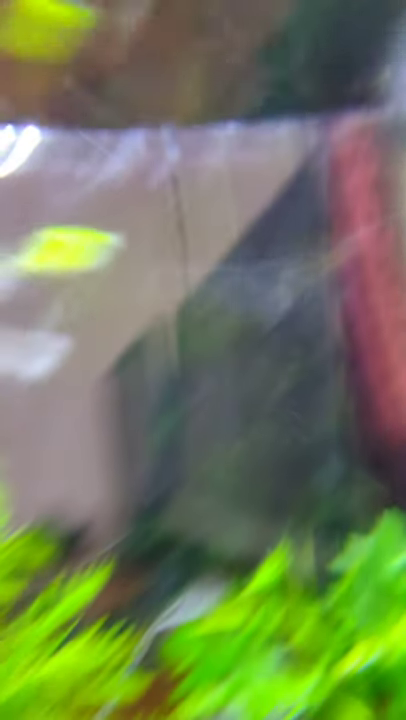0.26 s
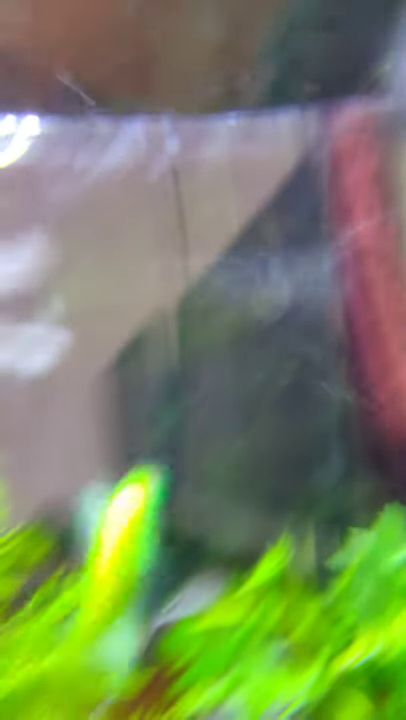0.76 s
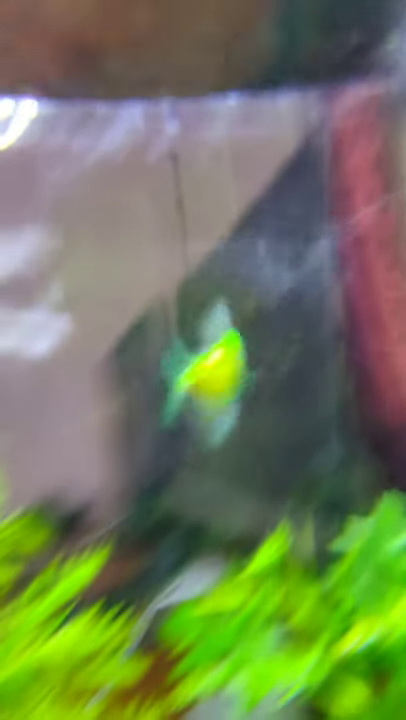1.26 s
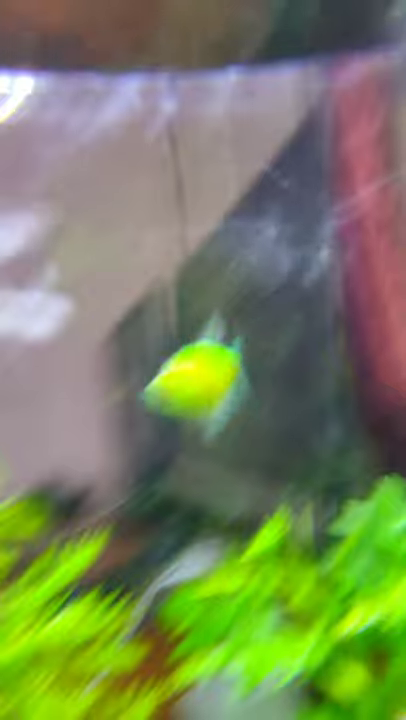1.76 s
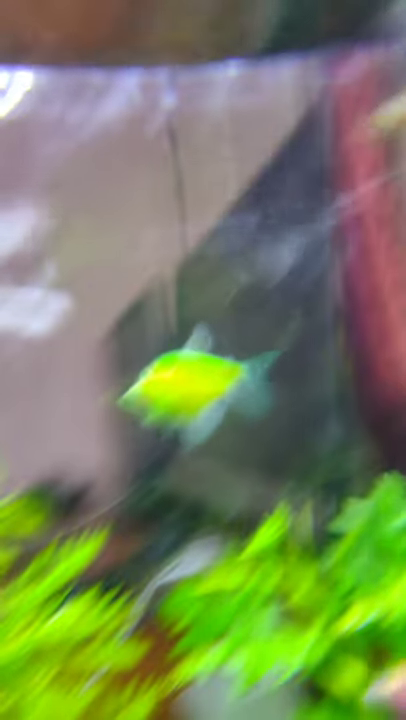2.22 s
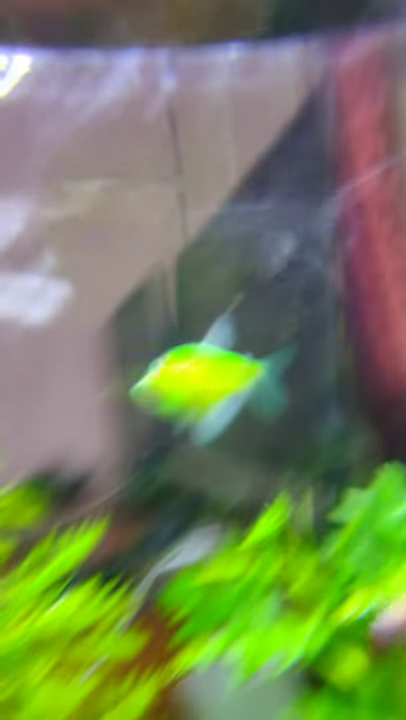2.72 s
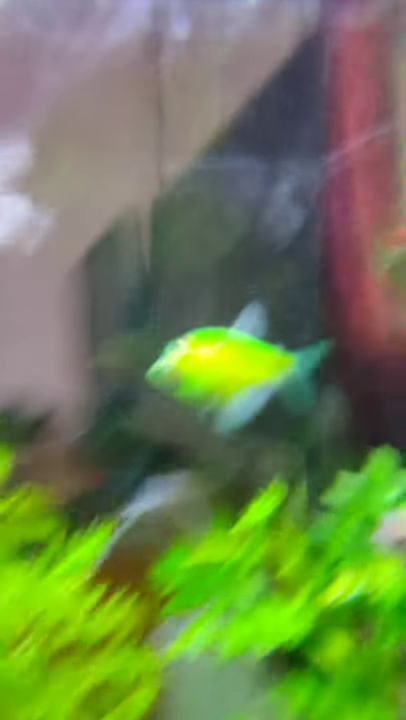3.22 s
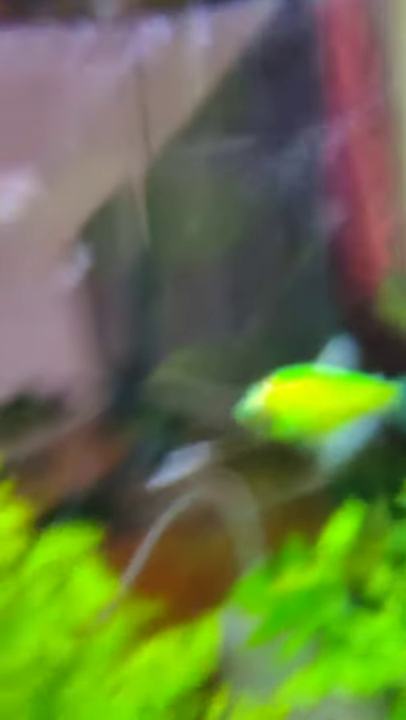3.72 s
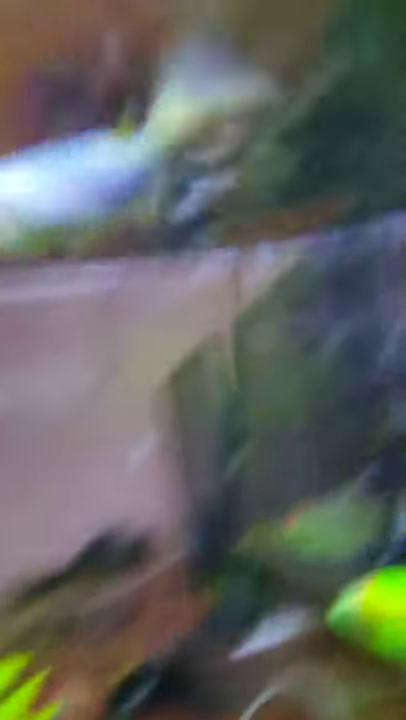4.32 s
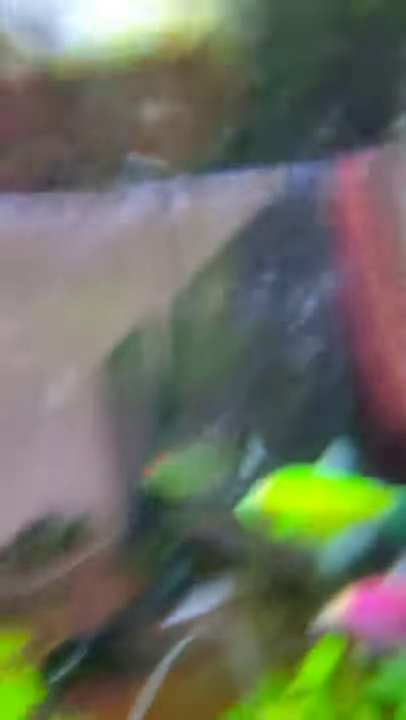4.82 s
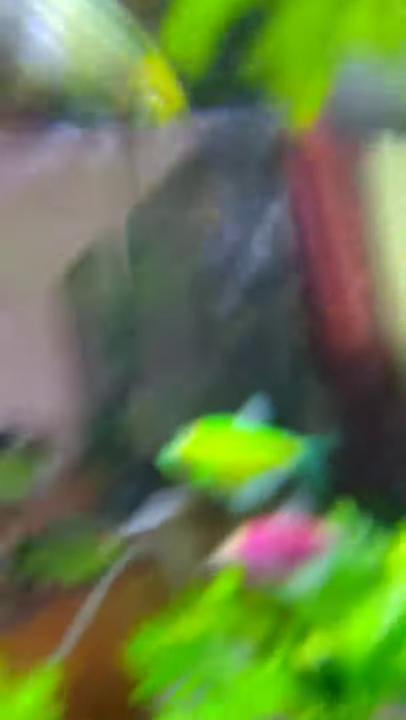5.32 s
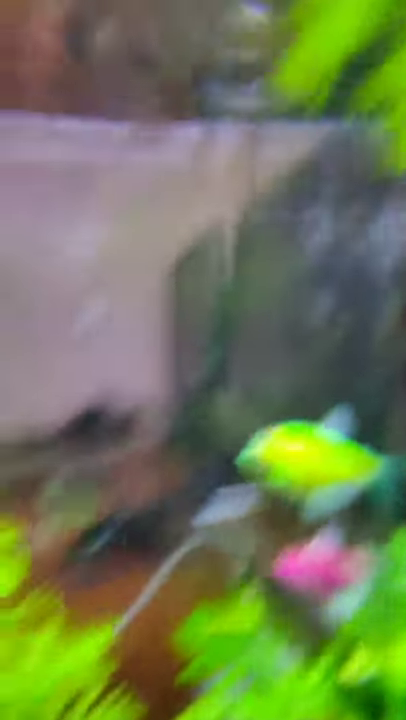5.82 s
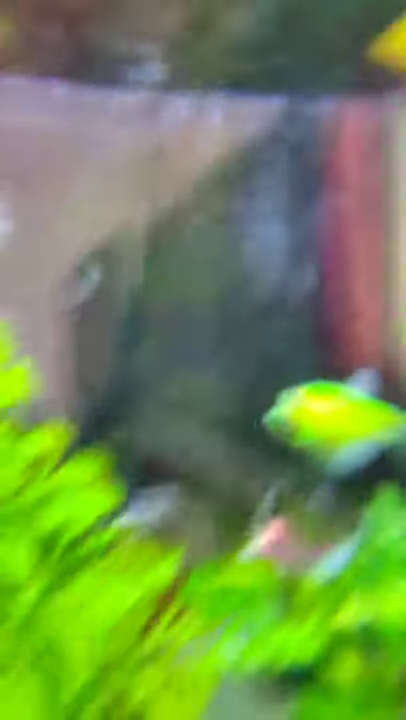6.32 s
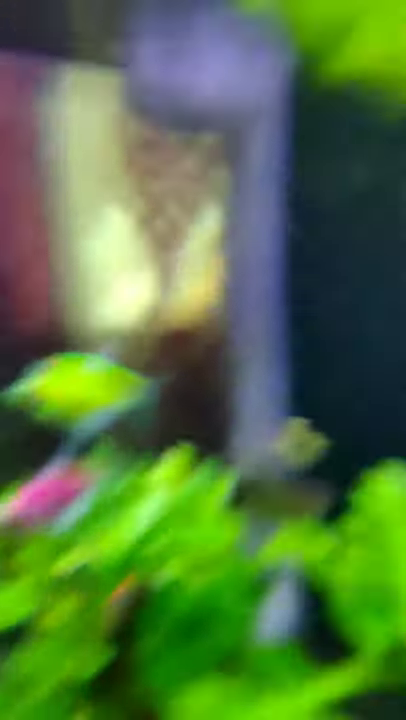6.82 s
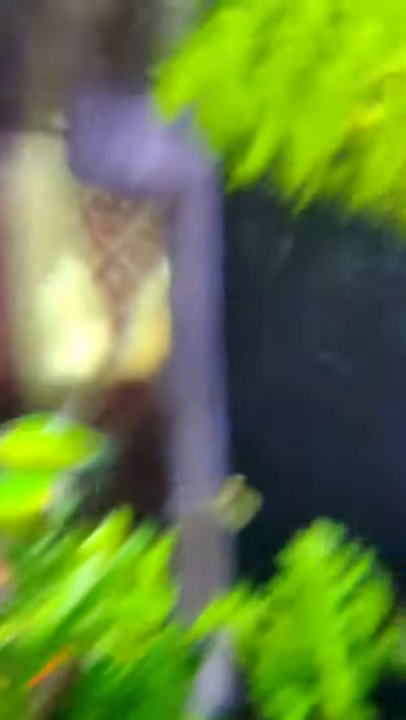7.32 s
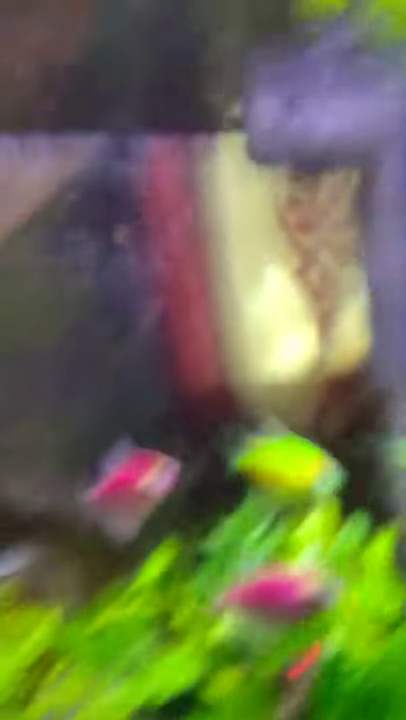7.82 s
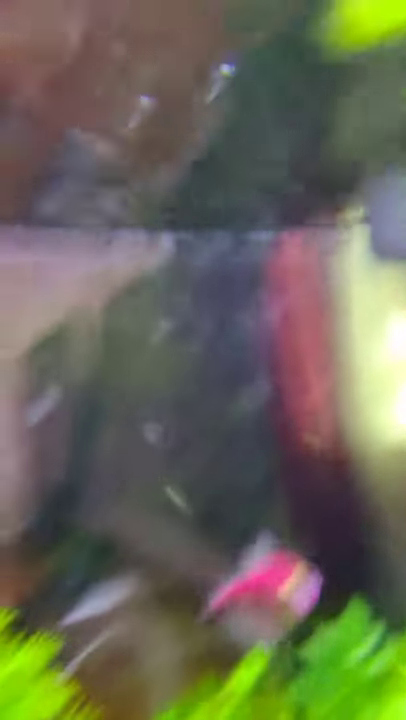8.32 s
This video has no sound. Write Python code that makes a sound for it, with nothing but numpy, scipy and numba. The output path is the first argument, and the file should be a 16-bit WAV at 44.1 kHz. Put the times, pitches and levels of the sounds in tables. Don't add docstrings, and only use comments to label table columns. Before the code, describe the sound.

Bubbles gurgle and pop close by, muffled underwater in a fish tank, over a steady low pump hum and a few dull thumps.

```python
import sys
import numpy as np
from scipy import signal
from scipy.fft import rfft, irfft
from scipy.io import wavfile
from scipy.ndimage import uniform_filter1d, minimum_filter1d
from numba import njit

SR = 44100
rng = np.random.default_rng(int(sys.argv[2]) if len(sys.argv) > 2 else 0)


def persist_wave(psi):
    counts = np.round(np.clip(psi, -1, 1) * 32767).astype(np.int16)
    wavfile.write(sys.argv[1], SR, np.atleast_2d(counts).T)


def convert_level_to_amplitude(level_db):
    exponent = np.asarray(level_db, float) / 20
    return 10 ** exponent


N = 377496
PINCH_RAD = 5.5

# t/s, peak level/dB, f/Hz, ring/cycles
LARGE_BUBBLES = [(0.055, -12, 844, 18), (0.723, -9.5, 857, 4.3), (0.955, -2, 930, 4.6),
                 (0.993, -8.5, 773, 6.9), (1.015, -2, 804, 5.2), (1.041, -3.5, 847, 8.2),
                 (1.236, -1.5, 910, 3.1), (1.301, -8, 805, 8.3), (1.333, -8.5, 751, 11.3),
                 (1.654, -12.5, 818, 7.8), (1.742, -13, 758, 17), (1.918, -12.5, 835, 5.5),
                 (1.96, -8, 750, 7.6), (2.07, -5.5, 844, 8.3), (2.238, -17, 770, 29),
                 (2.303, -4.5, 794, 6.4), (2.35, -10, 808, 14.5), (3.572, -11.5, 869, 15),
                 (5.146, -15, 777, 14), (5.319, -12.5, 922, 10), (5.399, -6, 817, 7), (5.416, -3, 828, 5.5),
                 (5.495, -17, 773, 17), (5.925, -14, 796, 16), (6.015, -10.5, 790, 10.3),
                 (6.057, -5, 843, 11.4), (6.189, -8.5, 768, 33), (6.546, -8.5, 693, 4.5),
                 (6.984, -1.5, 700, 3.3), (7.211, -6, 936, 13)]
# t/s, peak level/dB, f/Hz, ring/cycles
MIDDLE_BUBBLES = [(0.439, -7, 1405, 7.5), (0.513, -2, 1194, 7.1), (0.564, -2, 1180, 8.5),
                  (0.643, -8, 1097, 14), (0.91, -18, 1340, 9.4), (1.481, -4.5, 1095, 8.8),
                  (2.049, 0, 1360, 3.7), (2.473, -10, 1077, 14), (2.948, -12.5, 1116, 18),
                  (3.411, -14, 1400, 10), (3.668, -8.5, 1312, 18), (4.427, -1.5, 1150, 9.6),
                  (4.523, 3, 1080, 4), (4.615, -3.5, 1240, 9.7), (4.79, -10.5, 1154, 11),
                  (4.852, -10, 972, 62), (4.95, -3, 1100, 16), (5.09, -13, 1170, 23.5),
                  (5.246, -7.5, 1160, 7.7), (6.848, -4, 1235, 13), (6.927, -2, 1290, 6.5),
                  (7.072, -2.5, 1290, 8.9), (7.546, -9, 1190, 29), (7.85, -14, 1012, 26),
                  (8.018, -1.5, 1323, 20), (8.054, -4, 1183, 16), (8.092, -9, 1190, 13.6),
                  (8.176, -16.5, 1218, 47), (8.433, -5.5, 1210, 16), (8.464, -10.5, 1187, 44)]


def set_rms(x, db):
    return x * convert_level_to_amplitude(db) / np.sqrt(np.mean(x ** 2))


def sieve(x, order, hz, kind="low"):
    return signal.sosfilt(signal.butter(order, hz, kind, fs=SR, output="sos"), x)


def walk(rate):
    hold = int(SR / rate)
    steps = np.repeat(rng.standard_normal(N // hold + 1), hold)
    smooth = uniform_filter1d(uniform_filter1d(steps, hold), hold)[:N]
    return smooth / smooth.std()


@njit
def ring(count, start, step, decay, glide, size, swell):
    out = np.zeros(count)
    for k in range(len(start)):
        phasor = size[k] + 0j
        turn, bend = np.exp(1j * step[k] - decay[k]), np.exp(1j * glide[k])
        shut, closing = 1., np.exp(-step[k] / swell)
        for i in range(start[k], min(count, start[k] + int(6 / decay[k]))):
            out[i] += phasor.imag * (1 - shut) ** 2
            phasor *= turn
            turn *= bend
            shut *= closing
    return out


def bubbles(s, db, hz, cycles, rise, swell):
    step = 2 * np.pi * hz / SR
    decay = np.log(1000) * hz / (3 * np.maximum(cycles, .3) * SR)
    glide = rise * step * decay / 6
    return ring(N, (s * SR).astype(np.int64), step, decay, glide, convert_level_to_amplitude(db), max(swell, .1))


def tank(x, wet_db):
    # f/Hz, level/dB, t60/s
    tank_modes = [(511.2, -2.5, 0.16), (682.5, 5.5, 0.021), (735, -7, 0.4), (868.4, -4, 0.15),
                  (956.3, -1, .07), (1066.3, -12, 0.32), (1190, -6, 0.056), (1290, 0.5, 0.032),
                  (1400, -7.5, 0.27), (1570, -17.5, 0.017), (1700, -1, 0.11), (1890, -24.5, 0.033)]
    t = np.arange(SR // 4) / SR
    response = np.zeros(len(t))
    for hz, db, t60 in tank_modes:
        t60 = min(t60, .17)
        response += convert_level_to_amplitude(db) * np.sin(2 * np.pi * hz * t) * np.exp(-np.log(1000) * t / t60)
    return x + convert_level_to_amplitude(wet_db) * signal.fftconvolve(x, response)[:N]


def loud_bubbles():
    # t/s, peak level/dB, f/Hz, ring/cycles
    gulp_events = [(0.453, -13, 235, 14), (0.593, -15, 210.2, 30), (0.727, -8.5, 217, 14.5),
                   (1.235, -12, 252, 2.9), (1.275, -6, 224, 3.4), (1.452, -17.5, 258, 5.2),
                   (1.628, -18, 375, 18), (2.067, -1.5, 450, 1.6), (3.554, -23, 247, 1.6),
                   (3.741, -7, 183, 5.7), (3.782, 5.5, 195, 1.1), (3.954, -11, 197, 12),
                   (4.443, -8.5, 200, 7.1), (4.606, -5.5, 214, 4.7), (4.651, -12, 210, 21),
                   (4.813, -18.5, 188, 4.2), (5.41, -4.5, 287, 2.4), (5.803, -5, 125, 5.6),
                   (5.849, -10, 167, 5.5), (6.252, -18, 330, 12), (6.466, -17, 286, 13),
                   (6.601, 0, 348, 1.9), (6.864, -3.5, 345.4, 1.4), (7.467, -13, 246, 6.2),
                   (7.74, -8, 269, 1.5), (7.781, 2.5, 198, 0.76), (8.249, -14, 225, 2.5),
                   (8.351, -9, 220, 1.5), (8.376, -9, 247, 4), (8.423, -14.5, 263, 6.1)]
    # t/s, peak level/dB, f/Hz
    split_events = [(0.0436, -16.5, 1600), (0.088, -19, 1550), (0.347, -25, 1940), (0.466, -13, 1960),
                    (0.507, -19, 1570), (0.552, -18.5, 1614), (0.9517, -24, 1500), (1.234, -27, 1590),
                    (2.05, -19, 1990), (2.4177, -23.5, 2100), (2.575, -20, 1527), (2.8703, -15, 1598),
                    (2.9953, -25.5, 1610), (3.313, -14.5, 2414), (3.856, -17, 1540), (3.97, -18.5, 1570),
                    (4.256, -20.5, 1640), (4.3902, -21.5, 1585), (4.7416, -18.5, 1560),
                    (5.0118, -21.5, 1606), (6.8479, -19, 1890), (6.9267, -15.5, 1700), (7.012, -14, 1600),
                    (7.242, -24.5, 1640), (7.672, -18.5, 1650), (7.722, -19, 1460), (7.865, -21.5, 1700),
                    (7.9964, -15, 1760), (8.043, -14.5, 1570), (8.422, -19.5, 1570)]
    small = bubbles(*np.transpose(split_events), 18.2, 0.093, PINCH_RAD) * convert_level_to_amplitude(6.5)
    near = bubbles(*np.transpose(LARGE_BUBBLES + MIDDLE_BUBBLES), 0.12, PINCH_RAD)
    near = tank(near, -38.5) * convert_level_to_amplitude(-0.5)
    gulps = bubbles(*np.transpose(gulp_events), 0.021, 0.72) * convert_level_to_amplitude(0.5)
    return sieve(near + small + sieve(gulps, 2, 110, "high"), 6, 2400)


def swarm(flow, count=5):
    s, _, parent_hz, _ = np.repeat(np.transpose(LARGE_BUBBLES + MIDDLE_BUBBLES), count, axis=1)
    late, ratio, size, length = rng.random((len(s), 4)).T
    when = s + .07 * late ** 1.5
    hz = parent_hz * .9 * 2.2 ** ratio
    octaves = np.log2(hz / 800)
    surface_db = flow[2, (s * SR).astype(int)]
    db = -21 - 7 * octaves - 8 * size + .5 * octaves * surface_db
    return bubbles(when, db, hz, 8 + 14 * length, 0.042, PINCH_RAD)


def chatter():
    # t/s, peak level/dB, f/Hz
    gurgle_events = [(0.014, -24, 249), (0.045, -18.5, 344), (0.268, -20, 218), (0.488, -15.5, 330),
                     (1.661, -15, 247), (1.95, -18, 349), (1.968, -14, 251), (2.756, -20, 206),
                     (3.277, -21, 149), (3.339, -17.5, 150.4), (3.566, -16, 462), (3.624, -18, 480),
                     (4.024, -14, 194), (4.061, -14, 479), (4.139, -10, 183), (4.222, -17, 490),
                     (4.247, -10.5, 216), (4.268, -15, 153), (4.49, -12, 195), (4.609, -18, 518),
                     (4.717, -11.5, 215), (4.899, -20, 189), (5.042, -19.5, 241), (5.247, -17.5, 193),
                     (5.302, -14.5, 286), (5.366, -15, 499), (5.473, -14.5, 449), (5.74, -15, 258),
                     (7.071, -16, 480), (7.57, -14.5, 249), (7.657, -13, 285), (8.031, -22, 514),
                     (8.508, -14, 261)]
    # t/s, peak level/dB, f/Hz
    chatter_events = [(0.091, -15, 860), (0.573, -24, 696), (0.909, -17.5, 1300), (1.097, -17, 760),
                      (1.158, -21, 732.0), (1.242, -17, 1140), (1.271, -16.5, 830), (1.375, -17.5, 824),
                      (1.558, -19, 870), (1.661, -16.5, 863), (1.779, -22, 668), (1.78, -17, 1240),
                      (1.785, -24, 861.0), (1.919, -12.5, 861.0), (2.067, -17.5, 1210),
                      (2.068, -10, 1410.0), (2.49, -16.5, 870), (2.866, -19.5, 1210), (3.413, -11, 1312),
                      (3.433, -17, 856), (3.475, -18, 870), (4.004, -21, 1280), (4.471, -17, 1100),
                      (4.596, -19.5, 950), (4.627, -18.5, 958.0), (4.836, -12, 1110), (4.854, -14, 1206),
                      (5.415, -14.5, 1165), (5.43, -13.5, 795), (5.504, -21.5, 830), (6.029, -17.5, 838),
                      (6.135, -16.5, 874), (6.26, -15.5, 848), (6.286, -18, 837), (6.375, -22.5, 843),
                      (6.875, -13.5, 966), (6.929, -14.5, 1254), (7.038, -22, 866), (7.041, -19, 1180),
                      (7.731, -15, 1442.0), (7.899, -20, 1220), (8.525, -12, 1248), (8.554, -26, 1054)]
    # t/s, peak level/dB, f/Hz
    blip_events = [(0.468, -17, 1726), (0.579, -17, 1610), (0.642, -19.5, 1623), (0.956, -27.5, 2010),
                   (1.048, -22, 1670), (1.236, -28, 2010), (1.632, -19, 1614), (1.651, -22.5, 2110),
                   (1.653, -23, 1600), (1.778, -31, 2140), (2.07, -26.5, 2340), (2.067, -11.5, 1413),
                   (2.069, -18.5, 1655), (2.119, -25, 2080), (2.531, -25.5, 2110), (2.606, -30, 2070),
                   (2.767, -27, 1711), (2.847, -26.5, 1787), (2.952, -24, 1570), (2.995, -26.0, 2060),
                   (3.008, -20.5, 1650), (3.2, -24.5, 1690), (3.215, -25, 2060), (3.566, -21.5, 1570),
                   (3.887, -21.5, 1453), (3.913, -24, 1658), (3.944, -21.0, 1630), (4.001, -23, 1635),
                   (4.118, -26, 1646), (4.426, -26, 2121), (4.514, -31, 2310), (4.525, -21.0, 1650),
                   (4.616, -22, 1440), (4.674, -27.5, 1860), (4.813, -28, 1910), (4.816, -22.5, 1650),
                   (4.836, -23, 1596), (4.84, -27, 1990), (5.245, -24.5, 1647), (5.681, -36, 2480),
                   (7.08, -17, 1587), (7.092, -25.5, 1960), (7.242, -19.5, 2075), (7.25, -15.5, 1675),
                   (7.331, -21.5, 1690), (7.334, -29, 2000), (7.378, -22, 1636), (7.62, -22, 1970),
                   (7.88, -22.5, 1920), (7.998, -16, 1650), (7.998, -20.5, 2160), (8.053, -23.5, 1584),
                   (8.462, -20, 1545), (8.462, -26, 1845), (8.507, -29, 1658)]
    # t/s, peak level/dB, f/Hz
    faint_ping_events = [(0.309, -56.5, 4188.0), (1.679, -54, 3560), (1.712, -53.0, 3240), (2.069, -39, 3050),
                         (2.123, -50, 3036.0), (2.994, -56.0, 4435.0), (3.255, -47, 3070), (3.313, -55, 5049.0),
                         (3.365, -48.5, 3280), (4.36, -56, 6815.0), (4.437, -53, 5490.0), (4.495, -51.5, 3250),
                         (4.892, -52, 6780), (5.087, -47.5, 3822.0), (5.724, -56, 7200), (5.82, -48.5, 3050),
                         (6.603, -49.0, 4350), (6.604, -60.0, 5943.0), (6.952, -50.5, 4974.0),
                         (7.091, -51, 3262.0), (7.113, -54.0, 3811.0), (7.113, -43, 3150), (7.399, -53.5, 5840)]
    low = bubbles(*np.transpose(gurgle_events), 10.2, 0.03, 3.5) * convert_level_to_amplitude(3.0)
    mid = tank(bubbles(*np.transpose(chatter_events), 12.9, 0.16, 3.7), -41.5) * convert_level_to_amplitude(4.5)
    high = bubbles(*np.transpose(blip_events), 21.0, 0.031, 4.5) * convert_level_to_amplitude(4.0)
    drops = bubbles(*np.transpose(faint_ping_events), 18.0, .02, 11.0) * convert_level_to_amplitude(10.0)
    return low + mid + high + drops


def scatter(x):
    t = np.arange(SR // 4) / SR
    t60 = 0.084
    echoes = rng.standard_normal(len(t)) * np.exp(-np.log(1000) * t / t60) * (t > .003)
    return x + convert_level_to_amplitude(-3) * signal.fftconvolve(x, echoes / np.linalg.norm(echoes))[:N]


def knocks():
    # t/s, peak level/dB, air stream dip/dB, pause/s
    knock_events = [
        (3.783, 12, -7, 0.056),
        (4.278, 3.5, -5.5, 0.14),
        (6.602, 4.5, -4.5, 0.11),
        (6.715, -38, -6.5, 0.12),
    ]
    s, db, dip_db, pause = np.transpose(knock_events)
    since = np.arange(N) / SR - s[:, None] - .006
    hold = np.exp(-(abs(since) / pause[:, None]) ** 12) * (since > 0)
    dip = convert_level_to_amplitude((dip_db[:, None] * hold).sum(axis=0))
    thud = bubbles(s, db + 3.5, np.full(len(s), 330.), 0.43, 0., 0.92)
    return sieve(thud, 2, [120, 1800], "band"), uniform_filter1d(dip, size=200)


def ticks():
    # t/s, peak level/dB, f/Hz
    pop_events = [(0.4675, -52.5, 4200), (0.5115, -54, 4200), (0.5307, -56, 4350), (1.333, -55, 4500),
                  (0.6435, -51.5, 4120), (1.037, -53, 4760), (1.2365, -53, 4120), (2.0673, -32.5, 3750),
                  (2.121, -47, 2970), (2.302, -60, 4500), (2.3645, -52.5, 4250), (2.575, -53.5, 4180),
                  (1.443, -54, 4200), (3.055, -55, 4550), (3.3504, -55.5, 4180), (3.365, -46.5, 4070),
                  (3.281, -47.5, 2620), (3.377, -53, 5050), (3.6721, -50.5, 4640), (3.783, -49.5, 4250),
                  (4.429, -53, 4400), (4.525, -50.5, 4300), (4.619, -52, 4200), (4.957, -57, 4180),
                  (5.43, -49, 4500), (5.5113, -51.5, 4750), (6.604, -39.5, 3720), (6.619, -47.5, 3000),
                  (5.25, -57.5, 4500), (7.0714, -49.5, 4370), (7.783, -47, 4030), (7.997, -47, 4500),
                  (8.0213, -45.5, 4450), (8.056, -48.5, 4150), (8.437, -51, 4200)]
    # t/s, peak level/dB, f/Hz
    ping_events = [(0.5745, -45.5, 3660), (0.954, -47, 6880), (3.3118, -43, 3300), (3.5206, -50.5, 5700),
                   (5.0854, -36, 3180), (5.1228, -44.5, 3230), (5.3704, -49.5, 3740), (5.461, -54, 5400),
                   (6.951, -45, 3300), (8.2432, -42, 7180), (8.3, -41, 4200)]
    pops = bubbles(*np.transpose(pop_events), 2.2, 0., 0.39) * convert_level_to_amplitude(14.5)
    pings = bubbles(*np.transpose(ping_events), 26.0, .03, 12.0) * convert_level_to_amplitude(5.0)
    return sieve(pops + pings, 2, 2200, "high")


def pump(hum_db, dip):
    # multiple of the mains rate, level/dB
    hum_partials = [(2, -0.5), (3, -36.5), (4, -15.5), (5, -18), (6, -17.5), (7, -25), (8, -31)]
    mains_hz = 50.03
    t = np.arange(N) / SR
    tone = np.zeros(N)
    for k, db in hum_partials:
        overtone = k > 2
        loudness = convert_level_to_amplitude(db + 4.93 * overtone * walk(9)) * dip ** overtone
        tone += loudness * np.sin(2 * np.pi * k * mains_hz * t + 0.55 * walk(5) + k)
    return np.sqrt(2) * convert_level_to_amplitude(hum_db) * tone


def sway(near):
    # t/s, depth level/dB, half width/s
    hum_fades = [(.2, -4, 0.024), (1.03, -4, 0.098), (1.52, -3.5, 0.18), (2.121, -4.5, 0.094),
                 (2.34, -5, 0.16), (2.631, -3, 0.065), (2.78, -1.5, .03), (3.25, -3.5, 0.2),
                 (3.82, -11, 0.081), (4.261, -16.5, 0.071), (4.98, -5.5, 0.05), (5.499, -3.5, 0.17),
                 (6.05, -4, 0.096), (6.15, -16, 0.03), (6.32, -4.5, 0.05), (6.66, -16, 0.056),
                 (6.779, -9, 0.083), (7.3, -5, 0.15), (7.87, -6, 0.11), (8.04, -8.5, 0.028),
                 (8.25, -15.5, .04), (8.5, -4, 0.072)]
    s, depth_db, half = np.transpose(hum_fades)[:, :, None]
    t = np.arange(0, N, 100) / SR
    fades_db = (depth_db * np.exp(-((t - s) / half) ** 2)).sum(axis=0)
    duck_db = -30 * uniform_filter1d(abs(near), size=2500)
    return -20 + np.interp(np.arange(N) / SR, t, fades_db) + duck_db


def controls():
    # t/s, level/dB
    current_curve = [(0.0, -35.5), (0.52, -30), (2.05, -34), (4.53, -26), (6.46, -31), (6.56, -36),
                     (8.56, -28.5)]
    # t/s, level/dB
    air_curve = [(0.0, -38), (1.88, -24.5), (2.26, -33), (6.41, -24.5), (6.751, -26.5), (6.98, -22.5),
                 (8.56, -28)]
    # t/s, level/dB
    surface_curve = [(0.0, -47), (0.74, -57), (2.84, -50.5), (5.1, -56.5), (5.7, -63), (5.87, -58.5),
                     (8.56, -52)]
    curves = [np.transpose(c) for c in (current_curve, air_curve, surface_curve)]
    return np.array([np.interp(np.arange(N) / SR, s, db - db.mean()) for s, db in curves])


def colour(x, points):
    hz, db = np.transpose(points)
    grid_hz = np.fft.rfftfreq(4096, 1 / SR)
    log_gain = np.interp(np.log(grid_hz + 1), np.log(hz), db) * np.log(10) / 20
    cepstrum = irfft(log_gain)
    cepstrum[1:2048] *= 2
    cepstrum[2049:] = 0
    return signal.fftconvolve(x, irfft(np.exp(rfft(cepstrum))))[:N]


def bed(flow, count=24000):
    size_hz = (200, 450, 1000, 2100)
    follow_shares = [
        (1.14, 0.01, 0.01),
        (0.54, 0.97, 0.6),
        (0.045, 0.73, 0.033),
        (0.02, 0.18, 0.48),
    ]
    # t/s, level/dB, f/Hz
    size_patches = [(0.0, 15.5, 502), (0.311, -10, 470.5), (1.091, -12, 209.4), (1.42, -5.5, 247.7),
                    (1.64, -8, 200.2), (2.3, -7.5, 1103), (2.33, -8.5, 464), (2.94, 9.5, 386.6),
                    (3.389, -7, 446), (4.28, 4.5, 1196), (4.79, -12, 365), (5.09, -7, 345),
                    (5.58, -9.5, 1970), (5.91, -9.5, 496), (6.3, -6, 1600), (6.42, -13.5, 526),
                    (6.33, -8, 199.8), (6.78, 5, 1150), (7.35, -11.5, 666)]
    # f/Hz, level/dB per Hz
    membrane = [(18, -30), (30, -3.5), (43, -15), (76, -10), (107, 1.5), (128, -2.5), (158, -8.5),
                (272, -4), (675, -9.5), (851, -5), (994, -12), (1230, -8), (2070, -23.5), (2330, -32),
                (2690, -40), (2860, -51), (3960, -77.5), (6710, -120)]
    when, pitch, size, length = rng.random((count, 4)).T
    when = when * N / SR * .999
    hz = 40 * 68 ** pitch
    moment = (when * SR).astype(int)
    place = np.interp(np.log(hz), np.log(size_hz), np.arange(len(size_hz)))
    size_flow = np.dot(follow_shares, flow[:, moment])
    flow_db = sum(np.clip(1 - abs(place - k), 0, 1) * b for k, b in enumerate(size_flow))
    puff_db = 2.97 * walk(30)[moment] * np.clip(1500 / hz, 0, 1)
    db = 20 * np.log10(hz / 1000) + np.clip(hz / 70 - 1, 0, 1) * flow_db + puff_db
    db = db + np.minimum(-2.4 * np.log(1 - size), 10)
    db = db - 6.5 * np.exp(-(np.log(hz / 704) / 0.13) ** 2) * (when > 3.5)
    patch_half_s, patch_width = 0.15, .16
    patch_db = np.zeros(count)
    for s, depth_db, f in size_patches:
        patch_db += depth_db * np.exp(-((when - s) / patch_half_s) ** 2 - (np.log(hz / f) / patch_width) ** 2)
    cycles = (5.7 + 36.7 * length) * np.maximum(hz / 1200, 1) ** .5
    cloud = bubbles(when, db + patch_db, hz, cycles, 0.04, 8.8)
    return set_rms(colour(tank(cloud, -46.5), membrane), -24.0)


def hollow(x, dip):
    large = signal.sosfiltfilt(signal.butter(2, [220, 740], "band", fs=SR, output="sos"), x)
    return dip * (x - large * (1 - dip ** 1.5))


def spray(near, surface_db, count=5000):
    # f/Hz, level/dB per Hz
    spray_tint = [(1800, -30), (2500, 0), (3100, -2), (4000, -8), (5000, -12), (6300, -20), (7200, -17),
                  (8200, -30)]
    when, pitch, size = rng.random((count, 3)).T
    drop_db = np.minimum(-4.0 * np.log(1 - size), 15)
    drops = bubbles(when * N / SR, drop_db, 2500 * 3 ** pitch, 22.0, 0.06, 2.6)
    hiss = rng.standard_normal(N) * convert_level_to_amplitude(2.8 * walk(28)) + set_rms(drops, -9)
    flare = 1 + 11.0 * uniform_filter1d(abs(near), size=100)
    fizz_db = 5 * np.exp(-((np.arange(N) / SR - 2.95) / 0.46) ** 12)
    flow = convert_level_to_amplitude(-67.5 + 0.18 * surface_db + fizz_db)
    return set_rms(colour(hiss, spray_tint), -1.6) * flare * flow


def shade(x):
    t = np.arange(N) / SR
    on = uniform_filter1d(1. * (t > 5.15) * (t < 6.84), size=2000)
    edges_hz = 2414 * np.array([1 - 0.06, 1 + 0.06])
    rest = sieve(x, 2, edges_hz, "bandstop")
    return x + on * (1 - convert_level_to_amplitude(-11)) * (rest - x)


def scene():
    flow = controls()
    near = loud_bubbles()
    thud, dip = knocks()
    hum = pump(sway(near), dip)
    bright = sieve(near, 2, 1000, "high")
    water = shade(hollow(bed(flow), dip) + spray(bright, flow[2]) * dip ** 0.5)
    chain = sieve(tank(swarm(flow), -45.5), 6, 2400)
    singles = scatter(chain + near + chatter()) * convert_level_to_amplitude(-1.5)
    return (hum + water + singles + ticks() + thud)[None]


def band_limit(x):
    return signal.sosfilt(signal.butter(12, 8200, fs=SR, output="sos"), x)


def record(dry):
    top = 0.6
    reach = minimum_filter1d(np.minimum(1, top / (abs(dry) + 1e-9)), size=400)
    held = dry * uniform_filter1d(reach, size=300)
    narrow = signal.sosfilt(signal.ellip(8, .2, 60, 7900, fs=SR, output="sos"), held)
    mix = narrow + .0037
    return band_limit(mix)


dry = scene()
out = record(dry)
persist_wave(out)
```